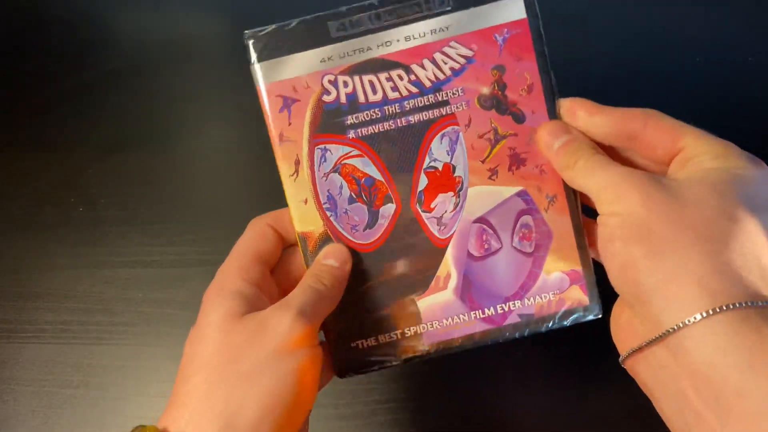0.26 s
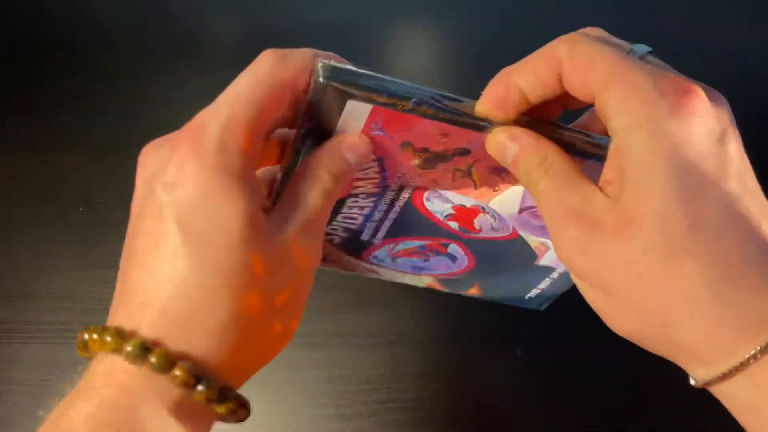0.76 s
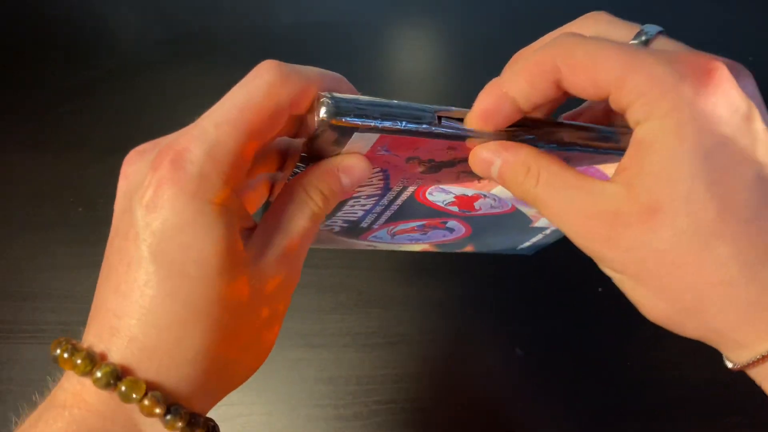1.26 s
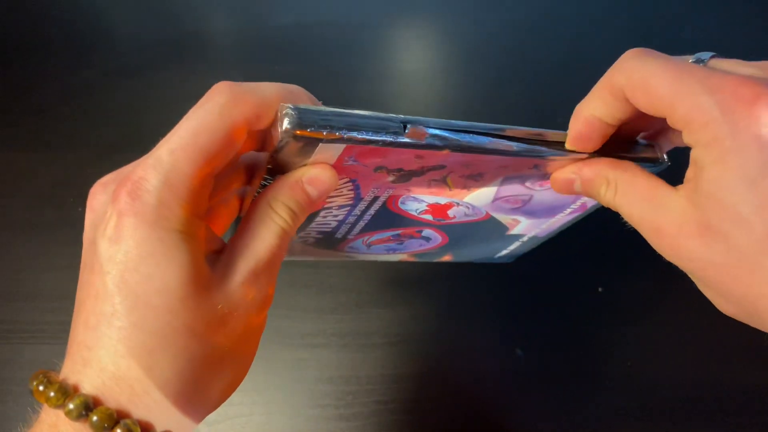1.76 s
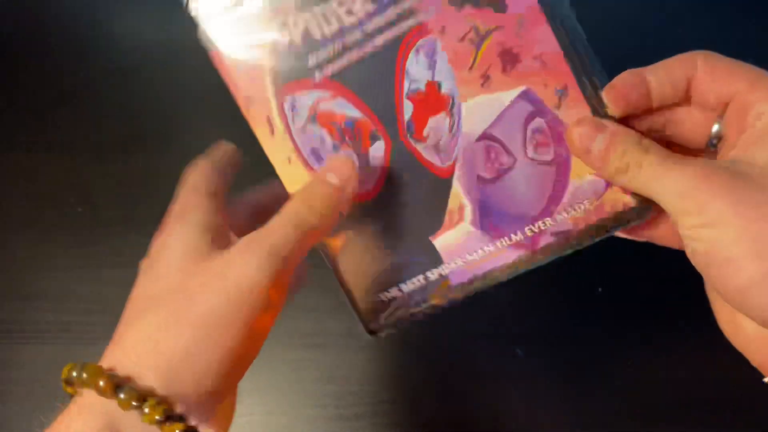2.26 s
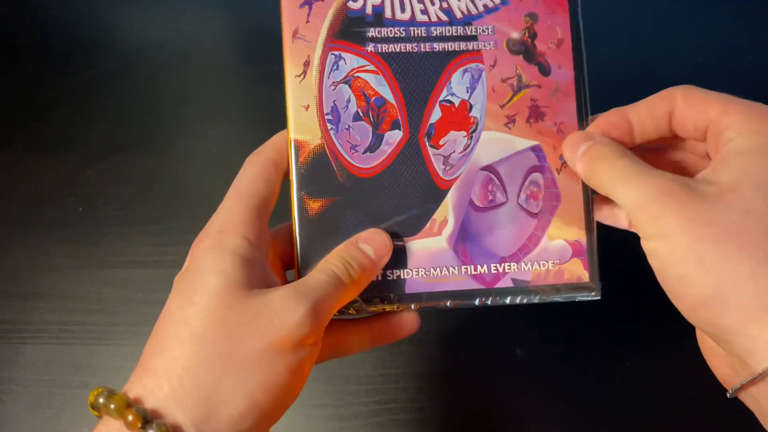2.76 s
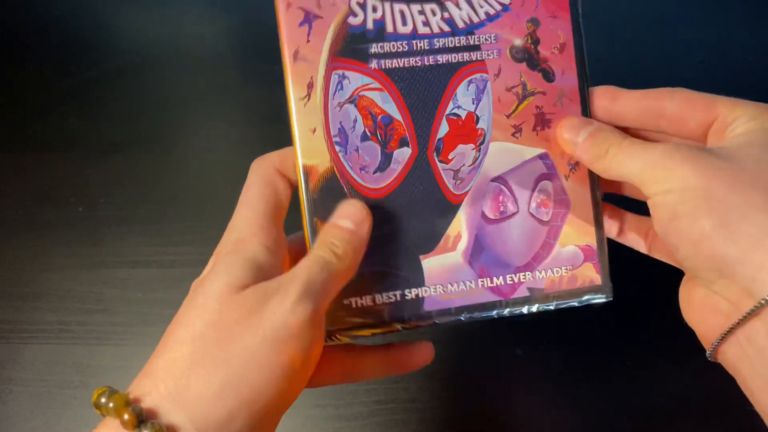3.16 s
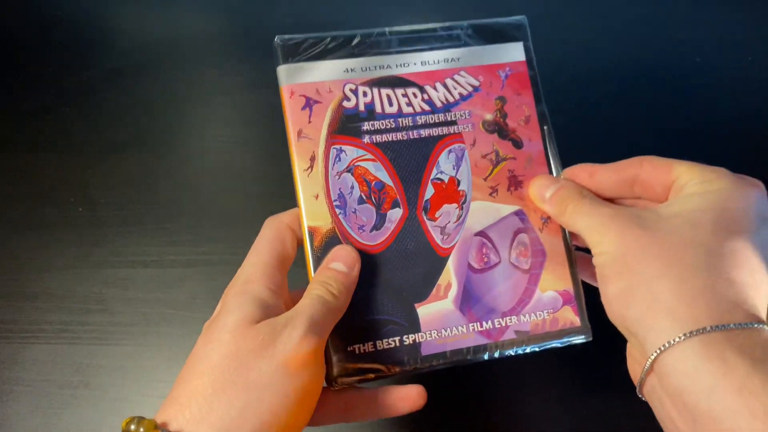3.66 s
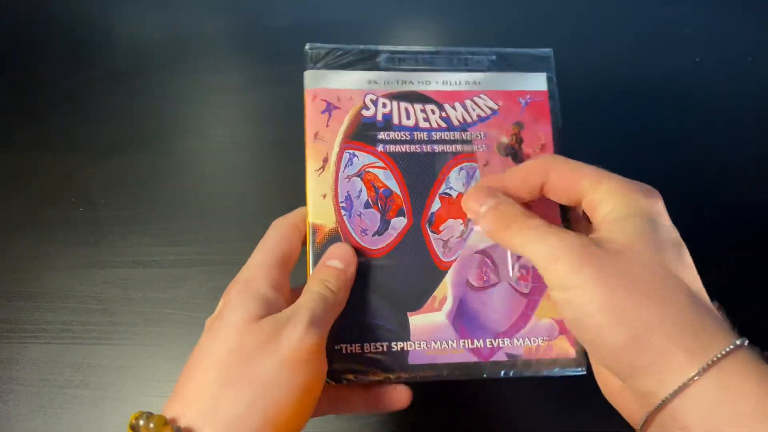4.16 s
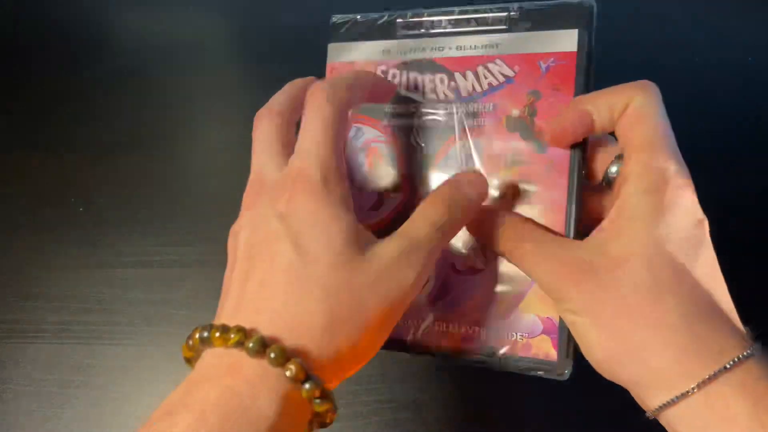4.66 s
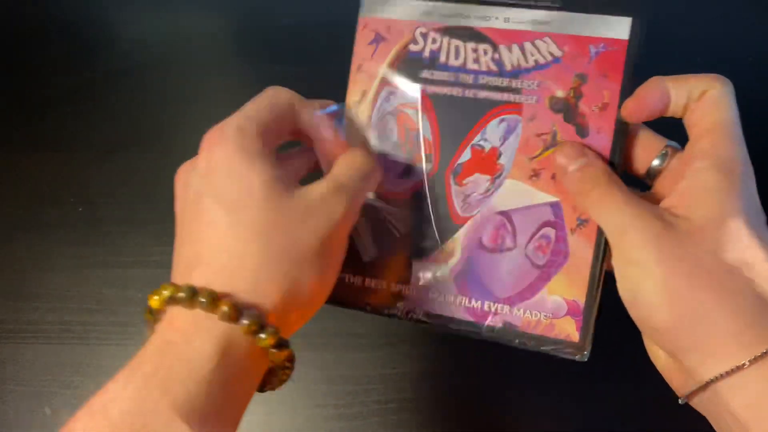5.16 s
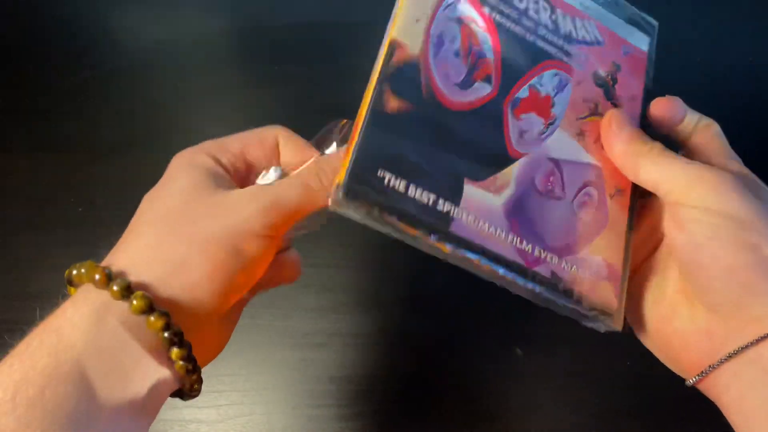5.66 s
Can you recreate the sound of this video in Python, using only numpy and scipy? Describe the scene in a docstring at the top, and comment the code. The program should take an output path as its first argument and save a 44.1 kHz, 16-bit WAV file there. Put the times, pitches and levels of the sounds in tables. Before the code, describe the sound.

Thin stiff shrink-wrap on a hard disc case, heard dry and close through two microphones placed near each other. Small taps and rubs, short bursts of picking, a sharp pop before two seconds, then near quiet around three. From about four and a half seconds the wrap crinkles ever more densely, with soft flaps of the loosened sheet, and is still loud at the cut.

```python
"""Unwrapping a plastic disc case

Fingers turn a shrink-wrapped case over a desk, pick at the film, turn it back, tear the film and peel it off.
Film: sharp snaps over fine crinkle, as filtered ticks and noise bursts. Hollow case: knocks and rubs, as
decaying sine modes. Loose sheet: flaps, as swelling sines and band noise. Low rumble and faint hiss beneath.
A small room (diffuse tail, one wall echo) and two closely spaced microphones."""
import sys
import numpy as np
from scipy import signal
from scipy.fft import rfft, irfft, next_fast_len
from scipy.io import wavfile
from scipy.ndimage import uniform_filter1d

SR = 44100
rng = np.random.default_rng(int(sys.argv[2]) if len(sys.argv) > 2 else 0)


def generate_wav(sig):
    """Save sig (samples, or channels by samples) to the path in sys.argv[1] as 16-bit PCM at SR."""
    pcm = np.round(np.clip(np.atleast_2d(sig).T, -1, 1) * 32767).astype(np.int16)
    wavfile.write(sys.argv[1], SR, pcm)


N = 260190

# modes of the hollow case, main resonance first, pitches scaled per blow: (f/Hz, relative level/dB, t60/s)
CASE_MODES = [(911.4, 6, 0.031), (924, -7.5, 0.016), (1049, -13.5, 0.076), (1373, -14, 0.069),
              (1420, 0.5, 0.013), (1605, -15.5, 0.012), (1890, -13, 0.054), (2120, -9, 0.015),
              (2420, -24.5, 0.043), (2838, -16.5, .025), (390, -14.5, 0.086)]


def amp(db):
    """Decibels to gain."""
    return 10 ** (np.asarray(db) / 20)


def evened(x):
    """Scales to an rms of 1."""
    return x / np.sqrt(np.mean(x ** 2) + 1e-20)


def read(points, hz):
    """Interpolates a table on a log-frequency axis."""
    f, value = np.transpose(points)
    return np.interp(np.log(hz + 1), np.log(f), value)


def add(mix, s, sound):
    """Mixes a stereo sound in at time s."""
    part = mix[:, max(round(s * SR), 0):][:, :sound.shape[1]]
    part += sound[:, :part.shape[1]]


def balance(left_db):
    """Left and right gains, raised and lowered by the same amount."""
    return amp([[left_db], [-left_db]])


def band_noise(low_hz, high_hz, size):
    """Noise of rms 1 between two frequencies."""
    sos = signal.butter(2, [low_hz, high_hz], "band", fs=SR, output="sos")
    return evened(signal.sosfilt(sos, rng.standard_normal(size)))


def pair(a, b, hz):
    """Left and right spectra, as alike as the microphones make them, from two unrelated ones."""
    # left-right likeness of diffuse sound: (f/Hz, likeness 0-1)
    likeness = [(50, 0.91), (130, 0.69), (350, 0.57), (1000, 0.27), (3000, 0.08), (5800, 0.3), (7000, 0.4),
                (10500, 1), (16000, 0.5)]
    same = np.clip(read(likeness, hz), 0, 1)
    return np.array([a, same * a + np.sqrt(1 - same ** 2) * b])


def causal(gain_db):
    """Minimum-phase impulse response with this spectrum, by folding the cepstrum."""
    cepstrum = irfft(np.log(amp(gain_db)))
    half = len(cepstrum) // 2
    cepstrum[1:half] *= 2
    cepstrum[half + 1:] = 0
    return irfft(np.exp(rfft(cepstrum)))


def still_air(level_db=-59, left_db=1.4):
    """The steady low rumble and faint hiss of the room, as shaped noise."""
    # spectrum of the still room: (f/Hz, relative level/dB)
    still_spectrum = [(20, -45), (32, -18.5), (42, -3), (56, -2), (135, -0.5), (170, -7.5), (225, -5),
                      (380, -13.5), (600, -21), (1100, -33), (2500, -40.5), (4500, -39.5), (7000, -51.5),
                      (11000, -41.5), (16000, -51.5)]
    hz = np.fft.rfftfreq(N, 1 / SR)
    noise = pair(*rfft(rng.standard_normal((2, N))), hz)
    air = irfft(noise * amp(read(still_spectrum, hz)), N)
    return amp(level_db) * evened(air) * balance(left_db)


def room(x, wet_db=-14, wall_db=-24, wall_s=0.028, build_s=0.0016):
    """A short diffuse tail, decaying at its own rate in each band, and one distinct echo from a wall."""
    # reverberation: (f/Hz, t60/s)
    reverb = [(200, 0.45), (1300, 0.21), (4000, 0.31), (9000, 0.21), (16000, 0.05)]
    size = SR // 2
    t = np.arange(size) / SR
    taps = rng.standard_normal((2, size)) * (rng.random((2, size)) < .15)
    taps *= 1 - np.exp(-(t / build_s) ** 2)
    hz, frame_s, z = signal.stft(taps, SR, nperseg=256)
    decay = amp(-60 * frame_s / read(reverb, hz)[:, None])
    tail = signal.istft(pair(*z, hz[:, None]) * decay, SR, nperseg=256)[1]
    tail *= amp(wet_db) / np.linalg.norm(tail[0])
    scatter = rng.standard_normal((1, 100)) * np.exp(-np.arange(100) / 40)
    add(tail, wall_s, amp(wall_db) * scatter / np.linalg.norm(scatter))
    return signal.oaconvolve(x, tail, axes=1)[:, :N]


def handling(grip_s=0.012, ease_db_per_s=14, release_db_per_s=309.5):
    """Summed finger strokes: each takes hold, eases as the film gives, and dies away when the fingers stop."""
    # strokes: (start t/s, length/s, crinkle drive level/dB, brightness before offsets/dB per octave,
    #           case rub drive level/dB)
    strokes = [(0, 0.2, -62.5, -2, -63), (0.26, 0.1, -60, -3.5, -74), (0.388, 0.052, -58, -2, -52),
               (0.698, 0.062, -45.5, 2, -54.5), (.775, 0.11, -51, .5, -53.5), (.92, 0.16, -62, -0.5, -62),
               (1.142, 0.095, -51.5, 2, -59.5), (1.223, 0.043, -55, -0.5, -60),
               (1.285, 0.11, -52, 2.5, -50.5), (1.378, .13, -57.5, 0.5, -66.5),
               (1.609, 0.07, -58.5, 3, -68), (1.658, 0.02, -44.5, 6, -49),
               (1.719, 0.09, -62.5, -1.5, -64.5), (1.977, 0.078, -48, 2.5, -50),
               (2.079, 0.057, -64, -0.5, -59), (2.258, 0.12, -65, -1.5, -69),
               (2.381, 0.072, -53, -.5, -55.5), (2.471, 0.051, -51, -1, -48.5),
               (2.571, 0.042, -56, -4, -59), (2.777, 0.15, -76, -2.5, -67), (3, 0.15, -66.5, -2, -68),
               (3.108, .14, -55, 0.5, -54), (3.262, 0.071, -70.5, -3, -63), (3.403, 0.29, -72.5, -5, -74.5),
               (3.836, 0.063, -61, 0, -54.5), (3.939, 0.011, -45, -4.5, -45), (4.039, 0.08, -53.5, -2, -60),
               (4.141, 0.039, -43.5, -0.5, -63), (4.234, 0.0055, -53, -2, -55),
               (4.311, 0.017, -51.5, 0, -53), (4.37, 0.13, -50, 3, -54), (4.522, 0.11, -50, 1.5, -60),
               (4.653, 0.031, -47, 0.5, -59.5), (4.781, 0.026, -48, -1, -62),
               (4.889, 0.046, -52.5, -1.5, -73), (4.924, .11, -40, 0, -63),
               (5.049, 0.11, -47.5, -1.5, -54.5), (5.236, 0.085, -43.5, 0.5, -47.5),
               (5.348, 0.057, -39.5, -0.5, -42.5), (5.439, 0.066, -36.5, -0.5, -48.5),
               (5.533, 0.086, -45.5, -1, -72), (5.65, 0.05, -38, 0, -73), (5.718, 0.12, -41.5, 0.5, -51),
               (5.788, 0.084, -35, -0.76, -50)]
    t = np.arange(N) / SR
    film_power, bright, rub_power = np.full(N, 1e-12), np.zeros(N), np.zeros(N)
    for s, length_s, film_level_db, brightness, rub_level_db in strokes:
        span = slice(max(round(s * SR), 0), round((s + length_s + .5) * SR))
        age_s = t[span] - s
        fall_db = ease_db_per_s * age_s + release_db_per_s * np.maximum(age_s - length_s, 0)
        shape = np.clip(age_s / grip_s, 0, 1) * amp(-fall_db)
        power = (amp(film_level_db) * shape) ** 2
        film_power[span] += power
        bright[span] += brightness * power
        rub_power[span] += (amp(rub_level_db) * shape) ** 2
    return np.sqrt(film_power), bright / film_power, np.sqrt(rub_power)


def sheet(effort, billow_db=-15, low_hz=220, high_hz=480, wobble=0.11, rumple_top=4, left_db=1):
    """Broad film pushes air: single rumpled flaps, and a soft billowing with each pull once it hangs free."""
    # pushes of air from palm and loose sheet: (start t/s, level/dB, f/Hz)
    flaps = [(0.406, -52, 334), (1.354, -49, 366), (2.615, -55, 306), (2.655, -45.5, 102.4),
             (4.044, -49, 412), (4.73, -40, 87.7), (4.795, -45, 314), (4.809, -45, 137), (5.013, -43, 397),
             (5.289, -43, 386), (5.384, -34, 378), (5.449, -27, 392), (5.485, -43, 290),
             (5.49, -44.5, 111.6)]
    swell_cycles, rumple_at_400_hz_db, rumple_db_per_octave = 1.7, -5, 10
    out, t = np.zeros((2, N)), np.arange(SR // 4) / SR
    for s, db, hz in flaps:
        drift = evened(uniform_filter1d(rng.standard_normal(len(t)), size=90))
        turns = np.cumsum(hz * (1 + wobble * drift)) / SR
        # small, high areas rumple more than broad, low ones
        rumple_db = rumple_at_400_hz_db + rumple_db_per_octave * np.log2(hz / 400)
        rumple = amp(rumple_db) * band_noise(hz / 2, hz * rumple_top, len(t))
        swing = np.sin(2 * np.pi * turns) + rumple
        swell = t * hz / swell_cycles
        add(out, s, (amp(db) * swell * np.exp(1 - swell) * swing)[None])
    loose = np.interp(np.arange(N) / SR, [4.7, 5.22], [0, 1])  # film comes free of the case
    billow = amp(billow_db) * loose * effort * band_noise(low_hz, high_hz, N)
    return (out + billow) * balance(left_db)


def case_ring(main_hz, hardness, spot_db=2, grip=0.026, apart=0.54, press_s=0.0012, size=4096):
    """The case's modes, of unit energy; their mix and pitch change with the spot and the grip."""
    t, first_hz = np.arange(size) / SR, CASE_MODES[0][0]
    out = np.zeros((2, size))
    for hz, db, t60_s in CASE_MODES:
        octaves = np.log2(hz / first_hz)
        pitch_hz = hz * main_hz / first_hz * (1 + grip * octaves * rng.standard_normal())
        phase = 2 * np.pi * rng.random() * min(abs(octaves), 1)
        phase = phase + apart * rng.standard_normal((2, 1))  # left and right differ
        mode_db = db + hardness * max(octaves, 0) + spot_db * rng.standard_normal()
        out += amp(mode_db - 60 * t / t60_s) * np.sin(2 * np.pi * pitch_hz * t + phase)
    return evened(out * (1 - np.exp(-(t / press_s) ** 2))) / np.sqrt(size)


def case(rubbing, knock_db=20, rub_db=-6, rub_hardness=1, rub_spread=0.067, left_db=1.5, count=8):
    """Fingertips knock on the hollow case and drag over it in small slips, exciting its modes."""
    # blows: (t/s, level before knock_db/dB, main resonance f/Hz,
    #         hardness/dB per octave: finger pads below 0, nails and snaps above)
    blows = [(0.1188, -36.5, 963, -1), (0.2517, -41.5, 928, 13), (0.3448, -40.5, 974, -19),
             (0.7508, -39.5, 918, 1), (0.9881, -32.5, 1007, 7), (1.552, -49, 906, 3), (1.6683, -39, 892, 1),
             (2.2983, -32.5, 889, -3), (2.405, -44, 930, -7), (2.877, -54.5, 898, 2), (3.0551, -38, 943, 9),
             (3.1229, -40, 865, 1.5), (3.8144, -32.5, 920, -12), (3.8536, -45.5, 920, 2.5),
             (4.0478, -38.5, 880, 5.5), (4.2486, -42, 848, 8), (4.4524, -43.5, 913, -21),
             (4.795, -37.5, 971, 0), (5.0156, -35, 1012, 15), (5.072, -40.5, 962, 5), (5.2895, -42, 820, 8)]
    out = np.zeros((2, N))
    for s, db, main_hz, hardness in blows:
        add(out, s - .001, amp(db + knock_db) * case_ring(main_hz, hardness))
    first_hz = CASE_MODES[0][0]
    rings = [case_ring(first_hz * rng.normal(1, rub_spread), rub_hardness) for _ in range(count)]
    slips = rng.standard_normal((count, N)) * (rng.random((count, N)) < .001)
    rub = np.zeros((2, N))
    for train, ring in zip(slips, rings):
        rub += signal.oaconvolve(train[None], ring, axes=1)[:, :N]
    return (out + evened(rub) * rubbing * amp(rub_db)) * balance(left_db)


def film_db(hz, brightness, own_hz, own_db=6, own_octaves=0.24, knee_hz=1700, top_hz=12000):
    """The film's spectrum: tighter creases are brighter, and each has one broad resonance of its own."""
    # colour of the film: (f/Hz, relative level/dB)
    film_colour = [(100, -27), (400, -11), (650, -7), (950, -2), (1500, -1), (2400, -1), (4000, -1.5),
                   (5500, 0), (8000, -1), (10000, 2), (11200, 2), (12800, 0), (14200, -2.5), (16000, -5)]
    own = own_db * np.exp(-.5 * (np.log2((hz + 1) / own_hz) / own_octaves) ** 2)
    tilt = brightness * np.log2(np.clip(hz, knee_hz, top_hz) / top_hz)
    return read(film_colour, hz) + own + tilt


def crease(ring, brightness, own_hz, patchy_db=3, tick_s=.0001, desk=0.088, desk_s=0.00033, size=1024):
    """One buckle, of unit energy: a tick, its echo off the desk, and bending waves dying out in the sheet."""
    hz, t = np.fft.rfftfreq(size, 1 / SR), np.arange(size) / SR
    ring_s, treble_s, flutter = .005, .0024, .45
    small_modes = evened(signal.resample(rng.standard_normal(size=56), len(hz)))
    colour = rfft(causal(film_db(hz, brightness, own_hz) + patchy_db * small_modes))
    # bending waves disperse: the treble arrives a moment before the bass
    delay_s = 2 * tick_s * (1 - hz / hz[-1])
    arrival = np.exp(-2j * np.pi * np.cumsum(delay_s) * hz[1])
    echo = desk * np.exp(-2j * np.pi * hz * desk_s * rng.uniform(0.81, 2.1))
    sides = pair(1 + echo, rng.choice([-1j, 1j]) * (1 - echo), hz)
    tick = irfft(colour * arrival * sides)
    unsteady = np.exp(flutter * signal.resample(rng.standard_normal(size=40), size))
    noise = rng.standard_normal((2, size)) * unsteady
    slow = rfft(evened(noise * np.exp(-t / ring_s)))
    fast = rfft(evened(noise * np.exp(-t / treble_s)))
    treble = np.minimum(hz / 12000, 1)  # short waves die first
    waves = irfft(colour * pair(*((1 - treble) * slow + treble * fast), hz))
    ring = np.clip(ring, .02, .95)
    return (np.sqrt(1 - ring) * evened(tick) + np.sqrt(ring) * evened(waves)) / np.sqrt(size)


def crinkle(effort, brightness, level_db=-1, duller=-.3, clump_db=2, low_hz=1800, high_hz=14000, count=48):
    """Countless tiny creases in short avalanches, mostly small, a few larger, as strong as the fingers work."""
    spread_db, ring = 4.6, .55
    # film stretched on the case fizzes finely; pulled free, it folds in fewer, larger creases
    per_s = np.interp(np.arange(N) / SR, [4.4, 5], [1700, 650])
    avalanche_db = clump_db * evened(uniform_filter1d(rng.standard_normal(N), size=220))
    size_db = spread_db * np.minimum(rng.exponential(1, N), 4)
    clicks = (rng.random(N) < per_s / SR) * amp(avalanche_db + size_db) * rng.choice([-1, 1], N)
    # the strain is let go at a steady pace
    clicks /= np.sqrt(abs(uniform_filter1d(clicks ** 2, size=1100)) + 1e-6)
    clicks *= effort * amp(level_db)
    shades = np.linspace(-6, 5, count)  # dB per octave
    wanted = brightness + duller + rng.standard_normal(N)
    shade = np.rint(np.interp(wanted, shades, np.arange(count))).astype(int)
    creases = [crease(ring, b, low_hz * (high_hz / low_hz) ** rng.random()) for b in shades]
    out = np.zeros((2, N))
    for i in np.flatnonzero(clicks):
        add(out, i / SR, clicks[i] * creases[shade[i]])
    return out


def stray_snaps(effort, brightness, over_db=8, extra_db=6, brighter=3, ring=0.64,
                low_hz=2000, high_hz=13000, count=200):
    """Middling buckles at chance moments, as strong as the fingers work."""
    out = np.zeros((2, N))
    for k, (when, pitch, strength) in enumerate(rng.random((count, 3))):
        i = int((k + when) / count * N)
        buckle = crease(ring, brightness[i] + brighter, low_hz * (high_hz / low_hz) ** pitch)
        gain = effort[i] * amp(over_db + extra_db * strength)
        add(out, i / SR, gain * np.sqrt(SR / 1000) * buckle)
    return out


def snaps(lead_s=0.00016):
    """The large buckles and tears of the film, each one crease."""
    # loudest buckles: (t/s, level over 1 ms/dB, after-ring share of energy 0-1 (clipped in crease),
    #                   brightness/dB per octave, crease resonance f/Hz)
    buckles = [(0.1071, -35, .95, 0.5, 7200), (0.1181, -30.5, 1, -7.5, 6600), (0.2338, -39, 1, 2, 7100),
               (0.2516, -23, 0.87, -0.5, 6700), (0.3077, -39, 0.6, 2, 7900),
               (0.331, -22.5, 0.94, 1.8, 6530), (0.5863, -46.5, 0.9, 2.5, 1900), (.7237, -28.5, 1, 1, 6300),
               (0.811, -32.5, .5, 4, 1700), (0.8763, -24.5, 0.73, 8.5, 1800),
               (0.9876, -15.5, 0.87, 0.5, 7660), (1.2003, -32.5, 0.6, 2.5, 7100),
               (1.2952, -33.5, 0.7, 0.5, 10400), (1.336, -28.5, 1, 1.5, 10400),
               (1.4395, -34, 0.9, 13.5, 1700), (1.5106, -40.5, 0.6, 2, 10000),
               (1.5834, -44, 0.6, 0.5, 4500), (1.6674, -10, 1, 6.5, 12800), (1.7552, -30, 0.95, 9, 4700),
               (1.7962, -29.5, 0.9, 9.5, 1800), (1.8346, -40.5, .7, 2, 13300), (1.8637, -43.5, 1, 5, 8950),
               (1.9889, -32, 0.54, 18, 1660), (2.0596, -31, 0.9, 1, 4130), (2.0952, -36.5, 0.9, 6.5, 4200),
               (2.245, -48.5, 0.3, 3.5, 4200), (2.5034, -37, 0.1, 11, 8800), (2.5997, -38, 0.7, -1, 7500),
               (2.619, -36.5, 1, -4.5, 8300), (2.7967, -51.5, .95, 1, 1920), (2.905, -42.5, 0.86, 7, 9400),
               (3.0535, -29.5, 0.99, -6, 6780), (3.112, -34.5, .95, 13, 7940), (3.1785, -40, 0.5, 5, 1930),
               (3.5016, -41, 0.54, 8, 1600), (3.811, -42.5, 0.97, -3, 1600),
               (3.8516, -24.5, 0.92, 5.5, 1600), (4.003, -41, 0.6, -4.5, 9400),
               (4.0495, -29.5, 1, -2.5, 13500), (4.087, -31, 1, -1, 4500), (4.1716, -30, .6, 2.5, 6040),
               (4.248, -30, 1, -0.5, 1550), (4.2915, -34, 0.8, -5, 13300), (4.4576, -34.5, 0.6, 5.5, 1600),
               (4.5851, -28, 0.1, 1.5, 7200), (4.7581, -36.5, 0.6, 1, 4470),
               (4.8151, -26.5, 0.66, 3.5, 5340), (4.8906, -34.5, 0.85, -1.5, 7460),
               (4.916, -22, 0.5, 4.5, 7150), (4.9369, -26, 0.9, 2.5, 4570), (4.9602, -22.5, .3, 17, 4700),
               (4.9856, -19.5, 0.84, 1, 10000), (5.0154, -18, 0.9, 5.5, 4500),
               (5.0485, -21.5, .1, 4.5, 2000), (5.0717, -21.5, 0.4, 19, 1900),
               (5.082, -18.5, 0.23, 4, 9700), (5.107, -24.5, 0.85, 4.5, 6200), (5.21, -29, 0.6, 4.5, 7000),
               (5.2205, -29.5, 0.75, 4, 8700), (5.2455, -16.5, 0.96, 11.5, 3100),
               (5.2896, -29, 0.1, 6, 10000), (5.3042, -24, 0.9, 6, 1800), (5.3495, -27, 1, -1.5, 1700),
               (5.3654, -22.5, 0.65, 3.5, 1880), (5.4102, -22, 0.74, 4, 1700), (5.436, -21, .4, 6, 7000),
               (5.449, -17.5, 0.64, 0, 13400), (5.5671, -27, 0.93, 4, 1710), (5.6604, -22, 0.6, 0, 13500),
               (5.678, -28, 1, -12, 13500), (5.7346, -27.5, 1, 0.5, 3100), (5.8053, -23.5, 1, 2, 2580),
               (5.8151, -29.5, 0.3, -2, 4500), (5.8786, -25, .7, -16, 2500)]
    out = np.zeros((2, N))
    for s, db, ring, brightness, own_hz in buckles:
        add(out, s - lead_s, amp(db) * np.sqrt(SR / 1000) * crease(ring, brightness, own_hz))
    return out


def scene():
    """Film and case in the room."""
    effort, brightness, rubbing = handling()
    near = sheet(effort) + case(rubbing)
    near += crinkle(effort, brightness) + stray_snaps(effort, brightness) + snaps()
    # the hands keep moving, so the reflections change from one snap to the next
    turn = 2 * np.pi * np.arange(N) / SR
    return still_air() + room(near * np.cos(turn)) + room(near * np.sin(turn)) + near


def record(dry):
    """The microphones are in step up to the treble; above it the left one lags. Then the band limit."""
    lag_s, split_hz, edge_hz = .00023, 6400, 15850
    size = next_fast_len(N + SR) * 2
    hz, z = np.fft.rfftfreq(size, 1 / SR), rfft(dry, size)
    left = z[0] * np.exp(-2j * np.pi * lag_s * np.maximum(hz - split_hz, 0))
    heard = irfft(np.array([left, z[1]]), size)[:, :N]
    low_pass = signal.firwin(301, edge_hz, window=("kaiser", 8), fs=SR)
    return signal.oaconvolve(heard, low_pass[None], "same")


dry = scene()
out = record(dry)
generate_wav(out)
```